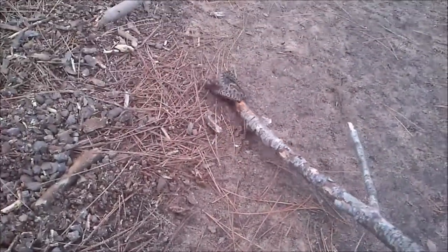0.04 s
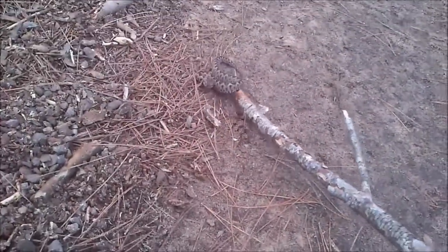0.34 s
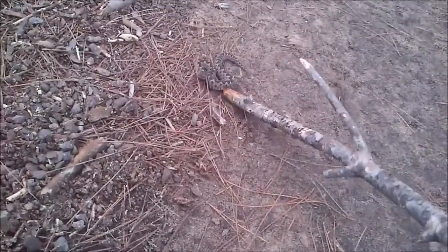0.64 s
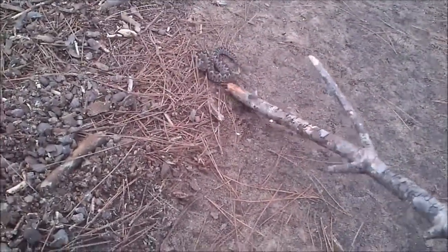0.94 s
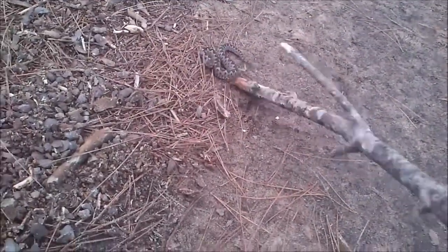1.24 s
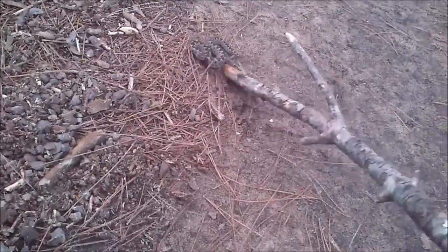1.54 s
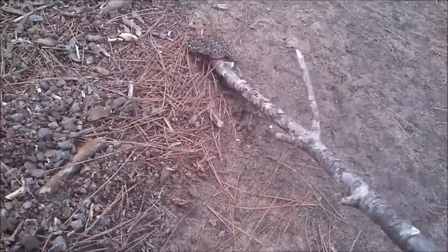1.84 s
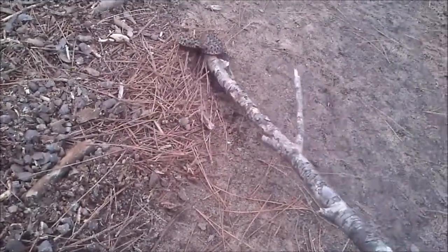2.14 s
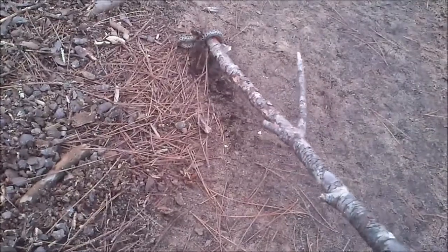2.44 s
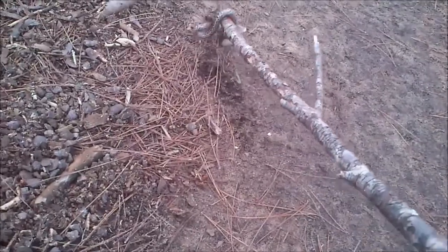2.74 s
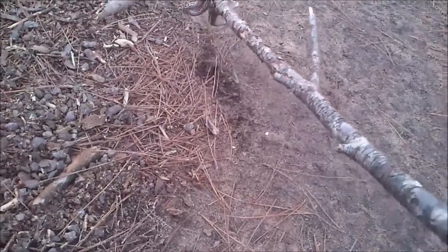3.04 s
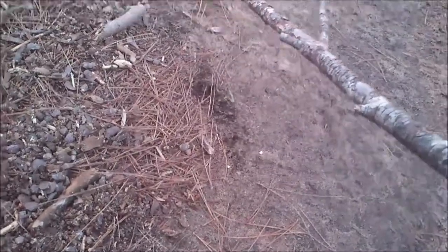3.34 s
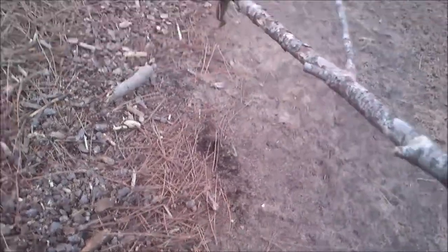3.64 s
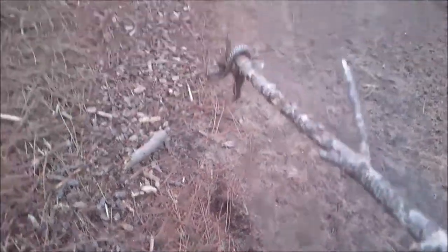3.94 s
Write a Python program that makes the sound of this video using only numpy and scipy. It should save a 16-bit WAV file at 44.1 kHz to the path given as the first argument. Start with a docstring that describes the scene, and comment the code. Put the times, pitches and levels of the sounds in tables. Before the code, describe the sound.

Dry pine needles tick and rustle faintly as a stick pushes through them, then shifts dully on the forest floor. Behind it are a far-off engine that slows to idle, a wavering hum, low air rumble and microphone hiss.

```python
"""On a forest floor of dry pine needles, a stick prods a small snake. A few needles snap in
brittle fracture, stick-slip friction makes faint scrapes, and the stick shuffles dully on the soil.
A distant engine throbs at its firing rate, changes speed and drops to idle, beside a wavering hum.
Forest air rumbles softly and the recorder hisses; the treble dips briefly now and then."""
import sys
import numpy as np
from scipy import signal
from scipy.fft import rfft, irfft
from scipy.io import wavfile
from scipy.ndimage import uniform_filter1d

SR = 44100
rng = np.random.default_rng(int(sys.argv[2]) if len(sys.argv) > 2 else 0)


def digitize_waveform(pressure):
    """Quantize a signal to 16-bit integers and store it at the path in sys.argv[1].

    Rows of a 2-D input are taken as channels; values are limited to [-1, 1].
    """
    field = np.atleast_2d(pressure).T
    bounded = np.clip(field, -1, 1)
    quanta = np.round(bounded * 32767).astype(np.int16)
    wavfile.write(sys.argv[1], SR, quanta)


N = 176400

EDGE_DB, EDGE_HZ, EDGE_WIDTH_HZ = -12, 14000, 7000  # level relative to the tick
SPLINTER_LEAD_S, SPLINTER_DECAY_S = .001, .004
# Breaking needles. Each row: time in seconds, tick level in dB, ring frequency in Hz,
# bandwidth in Hz, splinter level in dB.
NEEDLE_SNAPS = [(.0705, -56, 10200, 3000, -63), (.2565, -58, 9900, 3500, -71),
                (.3175, -55, 10000, 4000, -66), (.4200, -51, 3500, 6000, -65),
                (.6720, -38.8, 7700, 4400, -59.5), (.7545, -52.5, 7500, 2800, -60.5),
                (1.0665, -54, 8400, 3800, -61.5), (1.0697, -44, 8400, 3800, -65),
                (1.0725, -53, 8200, 4000, -61), (1.5352, -43.5, 8600, 6000, -64),
                (1.5356, -47.5, 5000, 3000, -61.5), (1.7440, -50, 6600, 3500, -59.5)]

def snaps(t):
    """Brittle fracture: a tick, broader in band the shorter it is, amid a spray of splinters."""
    out = np.zeros(N)
    for at, db, hz, width, splinter_db in NEEDLE_SNAPS:
        age = t - at
        tick = np.exp(-2 * (age * width) ** 2) * np.sin(2 * np.pi * hz * age)
        edge = np.exp(-2 * (age * EDGE_WIDTH_HZ) ** 2) * np.cos(2 * np.pi * EDGE_HZ * age)
        spray = np.exp(-np.maximum(-age / SPLINTER_LEAD_S, age / SPLINTER_DECAY_S))
        splinters = spray * unit(ring(rng.standard_normal(N), hz, width))
        out += undb(db) * (tick + undb(EDGE_DB) * edge) + undb(splinter_db) * splinters
    return out


SCRAPE_ATTACK_S, SCRAPE_RELEASE_S, SCRAPE_JERK_DB = 0.024, 0.09, 1.3
# Pushes of the stick through the needles. Each row: start in seconds, time until release in seconds,
# level in dB, centre frequency in Hz, bandwidth in Hz.
STICK_SCRAPES = [(0.23, 0.17, -71.5, 9800, 2200), (0.29, 0.13, -77, 8300, 6000), (0.6, .1, -71, 7800, 4895),
                 (0.717, 0.26, -76, 7400, 4800), (1.123, 0.15, -70.5, 6700, 1910),
                 (1.296, 0.22, -74, 6360, 1600), (1.335, 0.36, -72, 6850, 8105),
                 (1.613, 0.028, -65, 5870, 3200), (1.673, 0.26, -78.5, 6550, 4490),
                 (2.684, 0.071, -75, 1690, 2000)]

def scrapes(t):
    """Stick-slip friction: each jerky push sets off a crackle that rings the needles under the tip."""
    out = np.zeros(N)
    for start, length, db, hz, width in STICK_SCRAPES:
        attack = np.clip((t - start) / SCRAPE_ATTACK_S, 0, 1)
        release = np.exp(-np.maximum(t - start - length, 0) / SCRAPE_RELEASE_S)
        out += undb(db) * attack * release * unit(ring(crackle(), hz, width))
    return out * undb(SCRAPE_JERK_DB * walk(49.95))


def crackle(slips_per_s=1500, spread_db=2.2):
    """A Poisson process: needle slips on needle in tiny impulses of random size and sign."""
    slips = rng.random(N) < slips_per_s / SR
    size = undb(spread_db * np.minimum(rng.exponential(size=N), 4))
    return slips * size * np.sign(rng.standard_normal(N))


# Shifts of the stick on the soil. Each row: time of the peak in seconds, half length in seconds,
# level in dB, centre frequency in Hz.
SOIL_SHUFFLES = [(0.093, 0.13, -63, 314), (0.765, 0.053, -56.5, 209), (0.922, 0.041, -56, 212),
                 (1.585, 0.019, -66.5, 590), (2.356, 0.16, -72, 415), (2.678, 0.043, -51, 105),
                 (2.72, 0.065, -65.5, 377), (2.724, 0.078, -68.5, 1080), (2.89, 0.044, -70, 399.2),
                 (2.915, 0.13, -52.5, 104)]

def shuffles(t, relative_bandwidth=0.51):
    """Friction on soil: dull bands of noise swell and fade under Gaussian envelopes."""
    out = np.zeros(N)
    for at, half_length, db, hz in SOIL_SHUFFLES:
        swell = np.exp(-((t - at) / half_length) ** 2)
        out += undb(db) * swell * unit(ring(rng.standard_normal(N), hz, relative_bandwidth * hz))
    return out


# Spectral envelope of the engine above its second harmonic. Each row: frequency in Hz, level in dB.
ENGINE_OVERTONES = [(80, -72), (96, -66), (112, -61), (135, -72.5), (155, -75.5), (172, -70), (200, -76),
                    (300, -67)]
# Course of the engine. Each row: time in seconds, firing rate in Hz, first harmonic level in dB,
# second harmonic level in dB.
ENGINE_COURSE = [(0, 41.4, -55, -55), (0.161, 43.4, -51.5, -48.5), (0.352, 46.37, -47, -46.5),
                 (.49, 48.06, -50.5, -52), (0.621, 41.48, -58, -54), (.77, 43.91, -52, -52),
                 (0.882, 43.2, -60, -56), (1.0, 37.73, -62.5, -56.5), (1.13, 31.46, -63, -50.5),
                 (1.551, 32.55, -62, -50.5), (1.9, 34.8, -62, -51.5), (2, 35.48, -48, -52.5),
                 (2.1, 36, -66, -49.5), (2.34, 38.5, -47, -53), (2.45, 37.5, -54, -53),
                 (2.57, 35.18, -58, -57), (2.679, 37.5, -46.5, -46.5), (2.77, 44.76, -52.5, -63),
                 (2.898, 40.9, -61, -55.5), (3.11, 27.34, -57, -51.5), (4.0, 28.57, -71, -53)]

def engine(t, harmonics=6, rate_wobble=0.00605, flutter_db=0.4):
    """Periodic firing makes a harmonic series, of which only the lowest members carry this far."""
    times, firing_hz, first_db, second_db = np.array(ENGINE_COURSE).T
    overtone_hz, overtone_db = np.array(ENGINE_OVERTONES).T
    rate = np.interp(t, times, firing_hz) * (1 + rate_wobble * walk(14))
    phase = 2 * np.pi * np.cumsum(rate) / SR
    levels = [np.interp(t, times, first_db), np.interp(t, times, second_db)]
    levels += [np.interp(k * rate, overtone_hz, overtone_db) for k in range(3, harmonics + 1)]
    return sum(np.sqrt(2) * undb(db + flutter_db * walk(17)) * np.cos(k * phase)
               for k, db in enumerate(levels, 1))


# Course of the hum. Each row: time in seconds, frequency in Hz, level in dB.
HUM_COURSE = [(0, 231, -62), (.45, 231.9, -65.5), (.8, 230.4, -72.5), (1.35, 224, -62),
              (1.75, 223.1, -74.5), (2.25, 225.1, -67.5), (2.9, 231.3, -65.5), (3.5, 231.9, -64.5),
              (4, 230.7, -65.5)]

def hum(t, pitch_waver=.006, flutter_db=1.5):
    """Frequency and amplitude modulation: one faint sine tone wavers, fades and returns."""
    times, hz, db = np.array(HUM_COURSE).T
    pitch = np.interp(t, times, hz) * (1 + pitch_waver * walk(18))
    phase = 2 * np.pi * np.cumsum(pitch) / SR
    level_db = np.interp(t, times, db) + flutter_db * walk(16)
    return np.sqrt(2) * undb(level_db) * np.sin(phase)


# Spectrum of the forest air. Each row: frequency in Hz, relative spectral density in dB.
AIR_SPECTRUM = [(10, -17), (24, 4.5), (45, -1), (75, -1.5), (115, -2.5), (155, -11), (200, -10.5),
                (265, -10.5), (320, -14), (500, -20), (750, -23.5), (1200, -26.5), (2200, -34),
                (6000, -44.5)]

def forest_air(level_db=-54, swell_db=.6):
    """Ambient noise with its power at low frequencies: a softly swelling rumble."""
    return undb(level_db + swell_db * walk(6.85)) * coloured(AIR_SPECTRUM)


# Spectrum of the hiss. Each row: frequency in Hz, relative spectral density in dB.
HISS_SPECTRUM = [(300, -4), (2500, 2), (4200, 1.5), (6500, -0.5), (9000, -2), (10500, 0.3), (12800, -3),
                 (14500, 0), (15700, 1)]

def recorder_hiss(level_db=-68):
    """Electronic self-noise: a steady, nearly white hiss."""
    return undb(level_db) * coloured(HISS_SPECTRUM)


def undb(db):
    """The decibel law: 20 dB is a factor of ten in amplitude."""
    return 10 ** (np.asarray(db) / 20)


def unit(x):
    """Normalisation to an rms of 1."""
    return x / np.sqrt(np.mean(x ** 2))


def walk(rate_hz):
    """Slow random modulation of rms 1: levels held for 1 / rate_hz seconds, then smoothed twice."""
    hold = int(SR / rate_hz)
    steps = np.repeat(rng.standard_normal(N // hold + 1), hold)
    return unit(uniform_filter1d(uniform_filter1d(steps, hold), hold)[:N])


def coloured(points):
    """Spectral shaping: noise of rms 1 whose spectrum follows (Hz, dB) points."""
    hz, db = np.array(points).T
    bin_hz = np.maximum(np.arange(N // 2 + 1) * SR / N, 1)
    gain = undb(np.interp(np.log(bin_hz), np.log(hz), db))
    return unit(irfft(rfft(rng.standard_normal(N)) * gain, N))


def ring(x, hz, width_hz):
    """Resonance: two equal resonators in cascade give steep skirts."""
    b, a = signal.iirpeak(hz, hz / width_hz, fs=SR)
    return signal.lfilter(b, a, signal.lfilter(b, a, x))


def scene():
    """Superposition: all sources add at one microphone."""
    t = np.arange(N) / SR
    stick = scrapes(t) + snaps(t) + shuffles(t)
    return (stick + engine(t) + hum(t) + forest_air() + recorder_hiss())[None]


DIP_DEPTH_DB, DIP_DECAY_S, DIP_ABOVE_HZ, TOP_HZ = 21, .0053, 1100, 15720
# Brief dips of the treble. Each entry: time of the deepest point in seconds.
TREBLE_DIPS = [.129, .2148, .2993, .7905, 1.5802, 2.7318, 3.2442, 3.7988]

def record(dry):
    """Time-varying shelving: the treble dips briefly; a steep low-pass then limits the bandwidth."""
    t = np.arange(N) / SR
    low = signal.sosfiltfilt(signal.butter(4, DIP_ABOVE_HZ, fs=SR, output="sos"), dry)
    treble = dry - low
    dip_db = sum(DIP_DEPTH_DB * np.exp(-np.abs(t - at) / DIP_DECAY_S) for at in TREBLE_DIPS)
    dipped = low + undb(-dip_db) * treble
    return signal.sosfilt(signal.ellip(12, .1, 70, TOP_HZ, fs=SR, output="sos"), dipped)


dry = scene()
out = record(dry)
digitize_waveform(out)
```